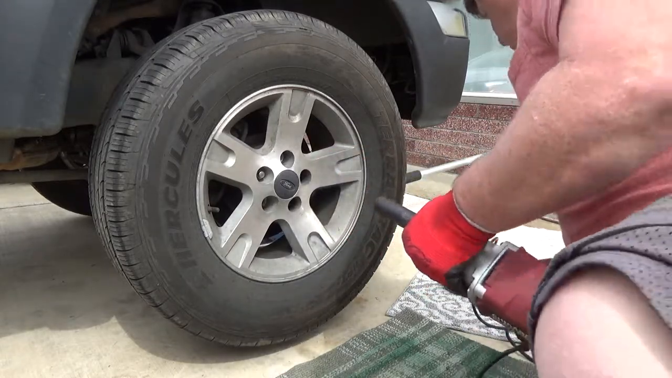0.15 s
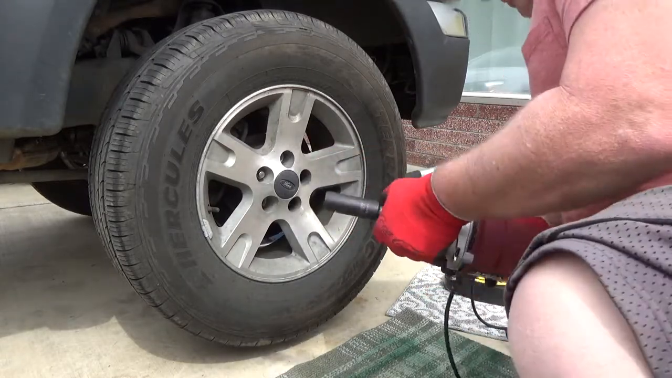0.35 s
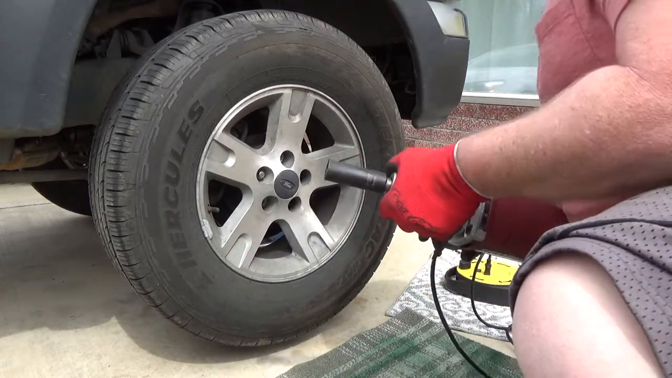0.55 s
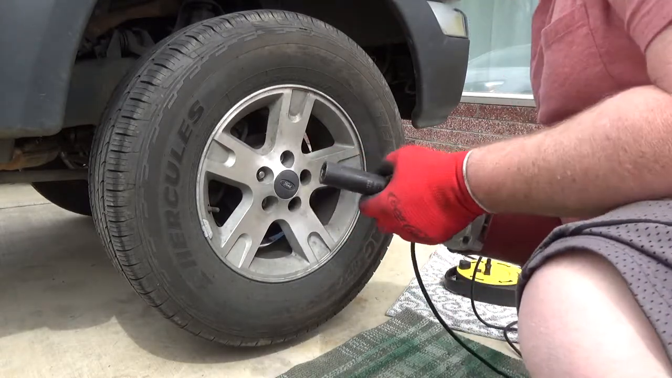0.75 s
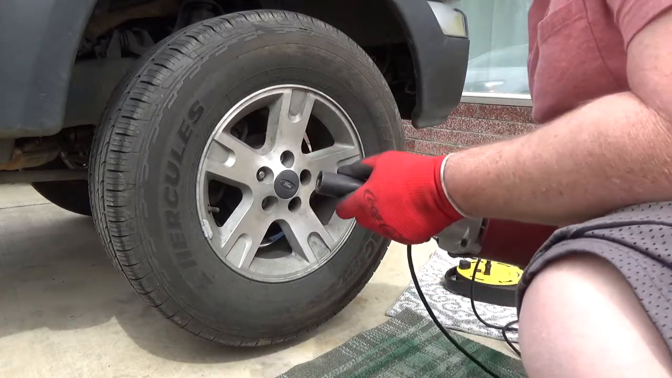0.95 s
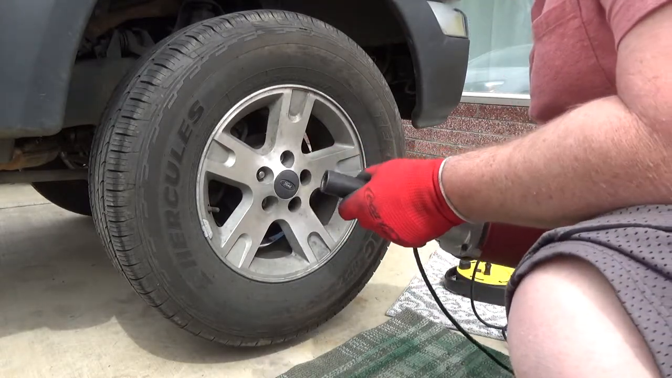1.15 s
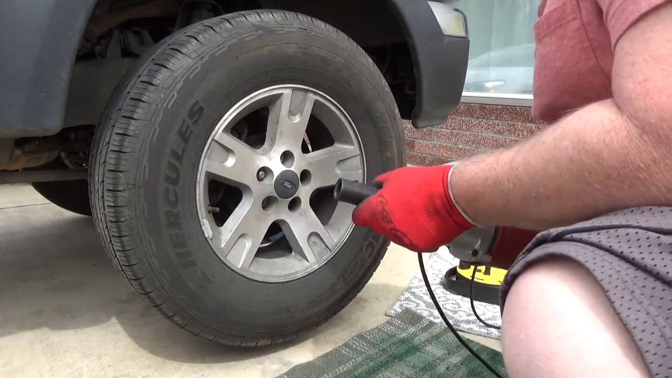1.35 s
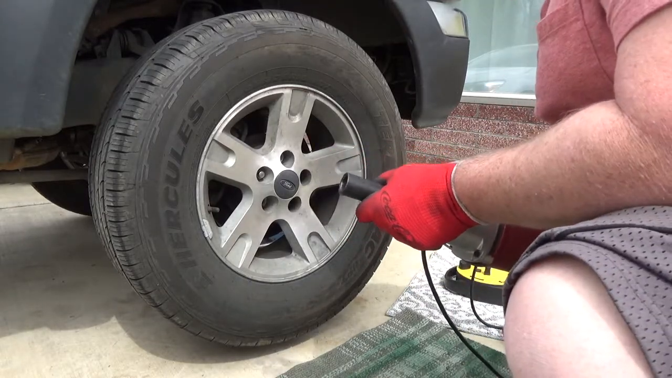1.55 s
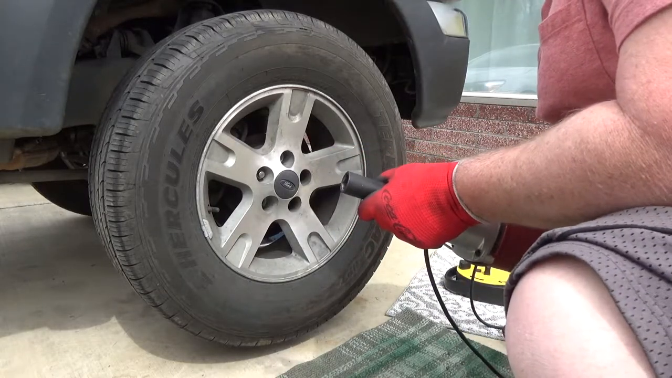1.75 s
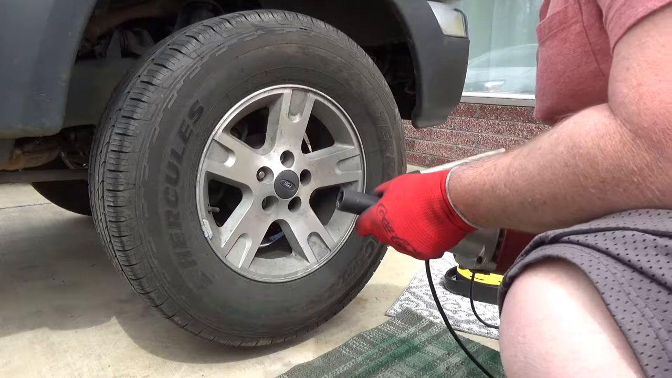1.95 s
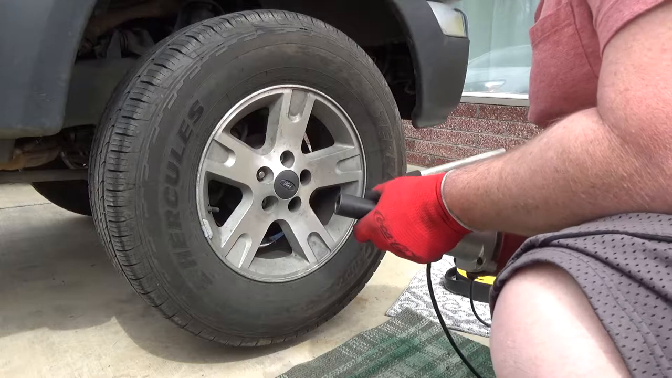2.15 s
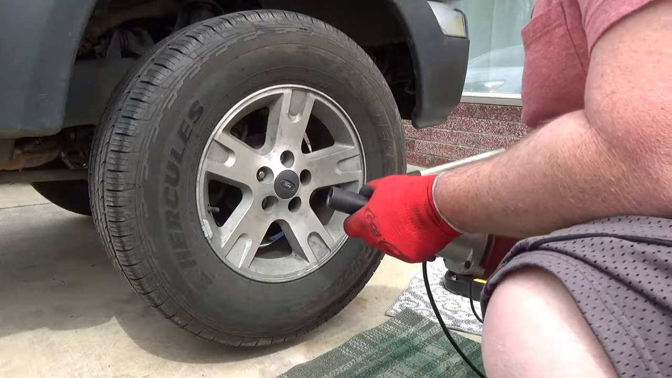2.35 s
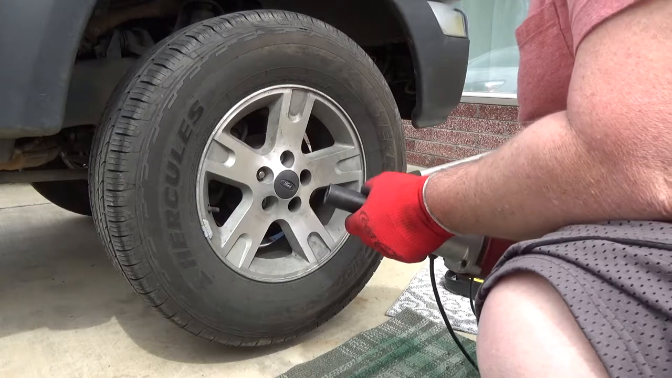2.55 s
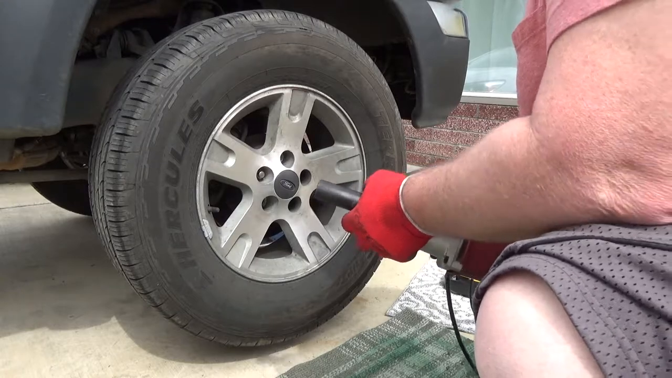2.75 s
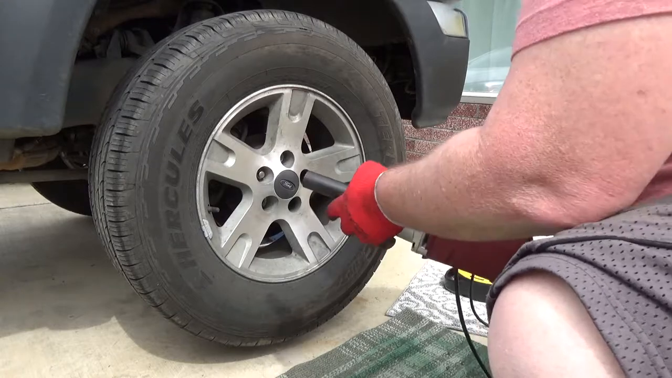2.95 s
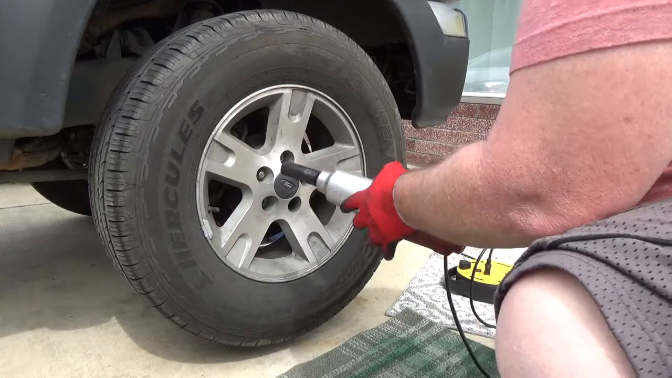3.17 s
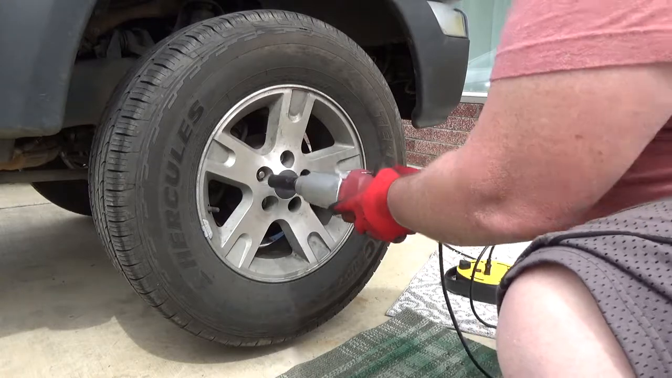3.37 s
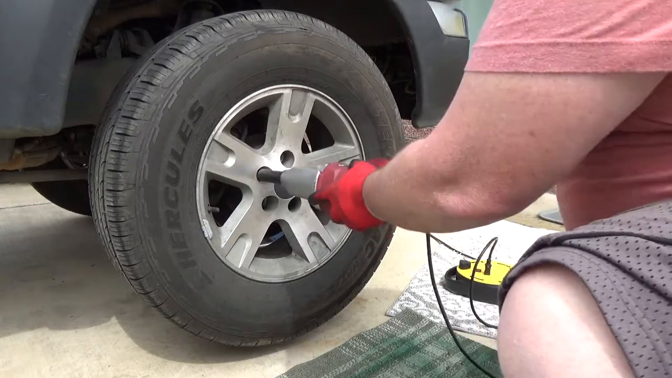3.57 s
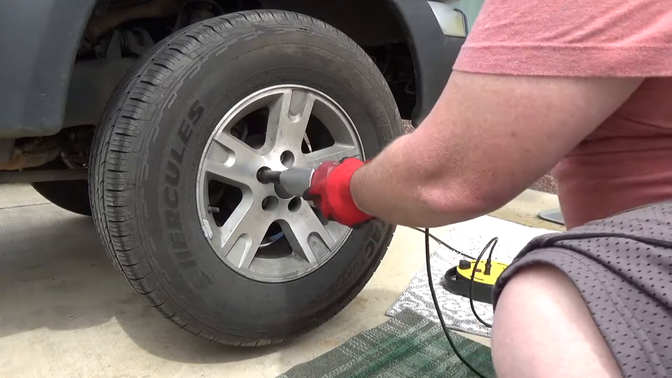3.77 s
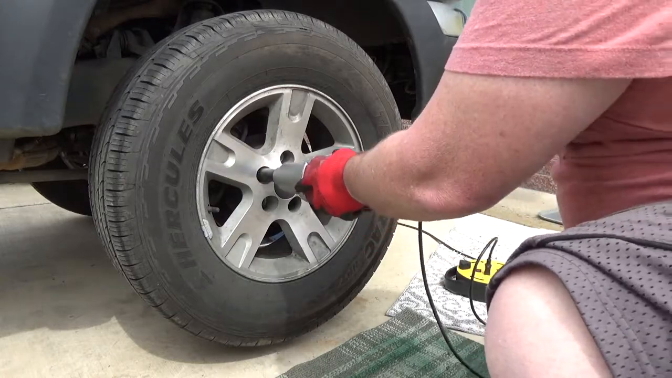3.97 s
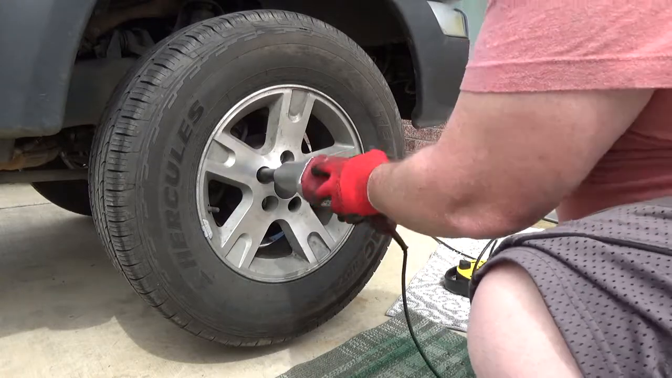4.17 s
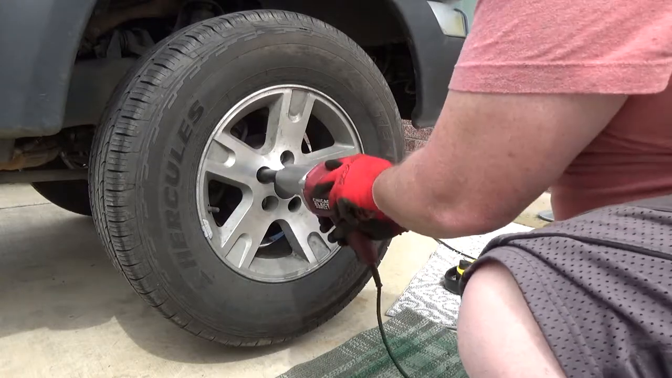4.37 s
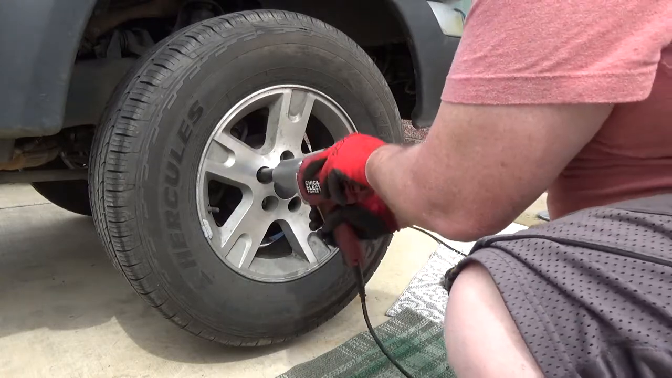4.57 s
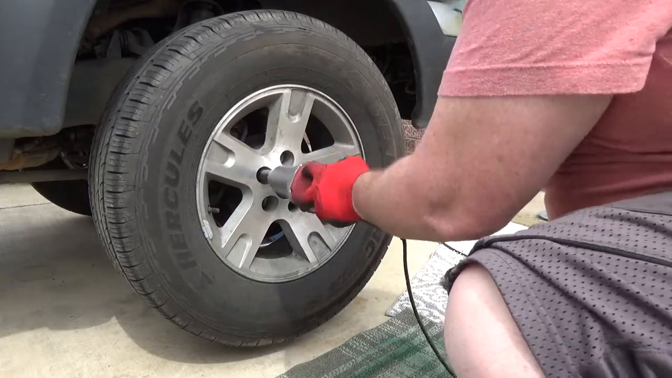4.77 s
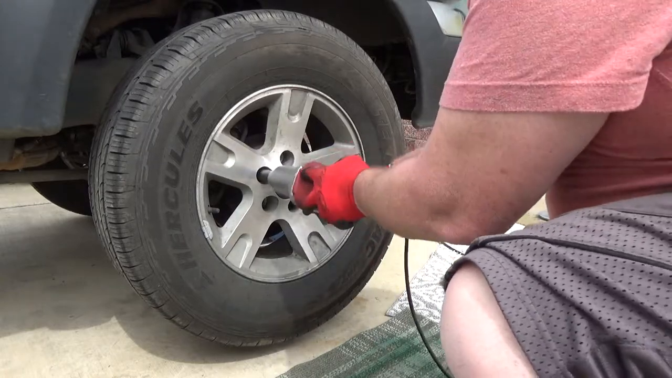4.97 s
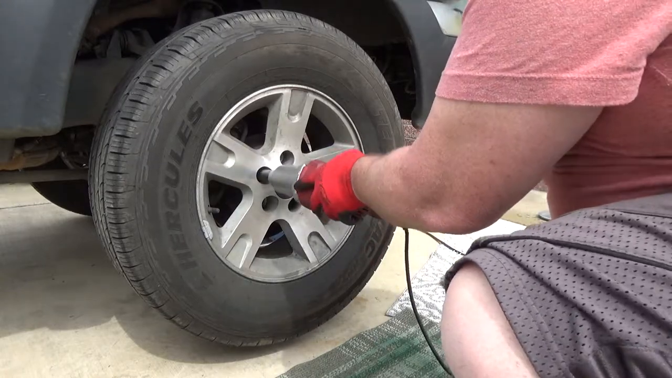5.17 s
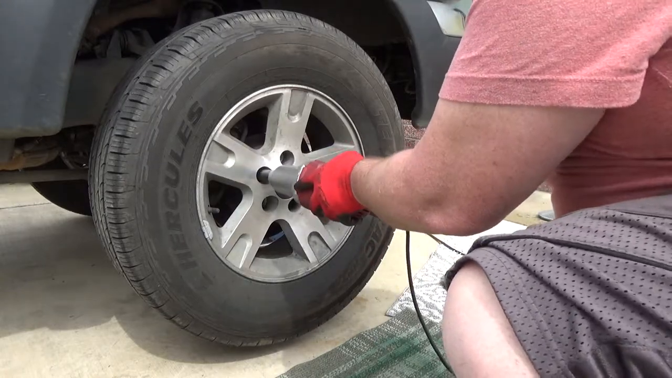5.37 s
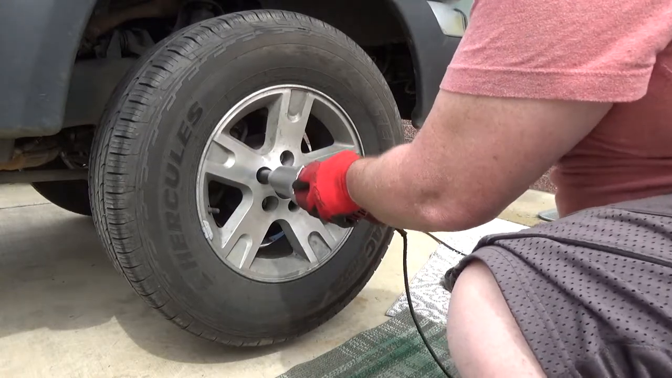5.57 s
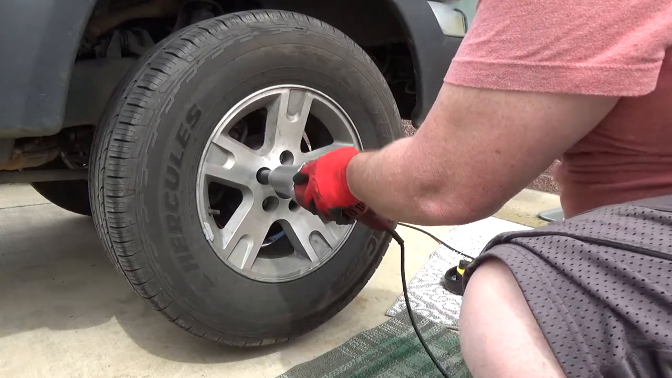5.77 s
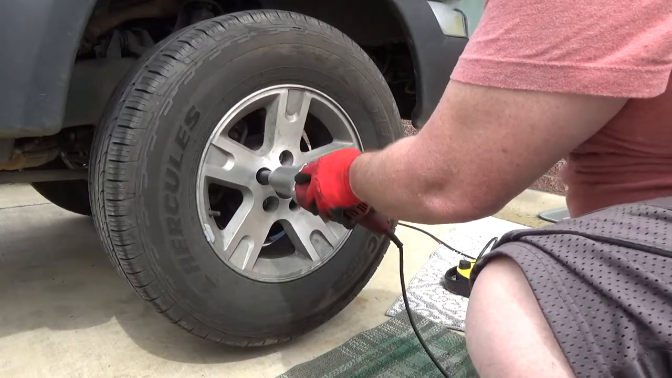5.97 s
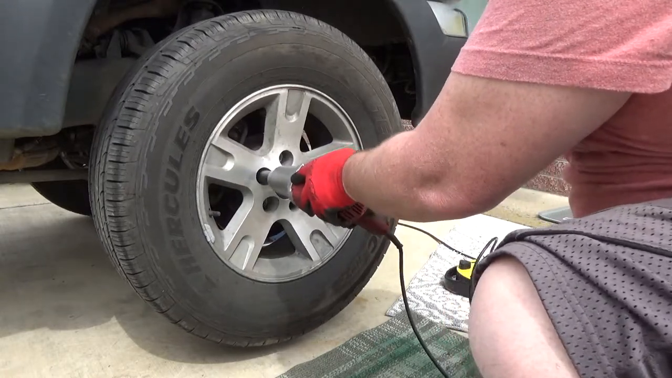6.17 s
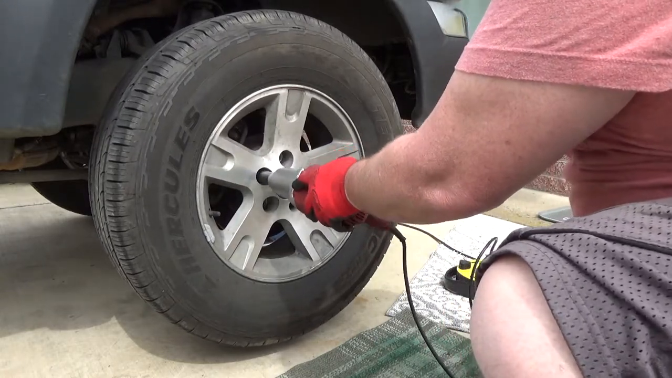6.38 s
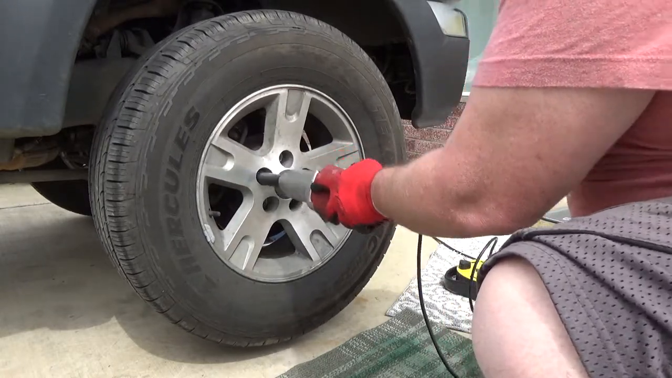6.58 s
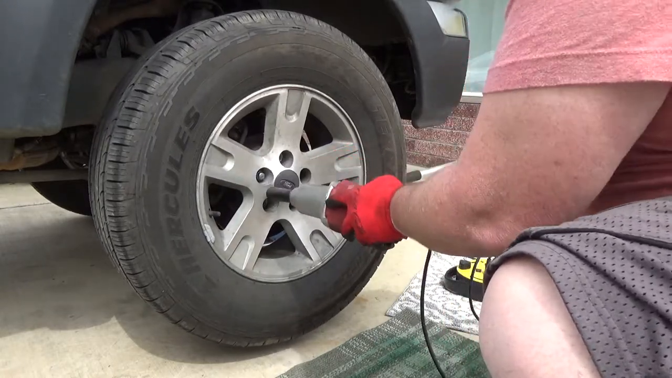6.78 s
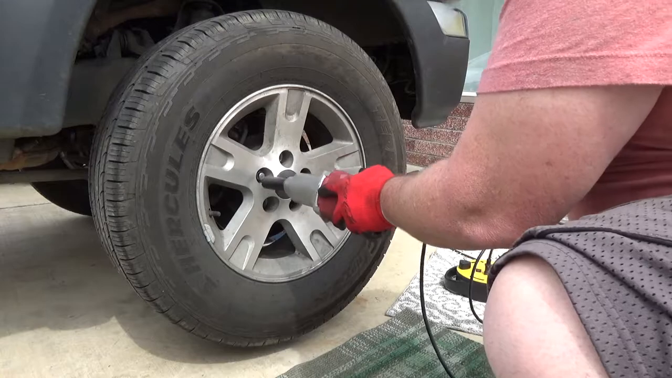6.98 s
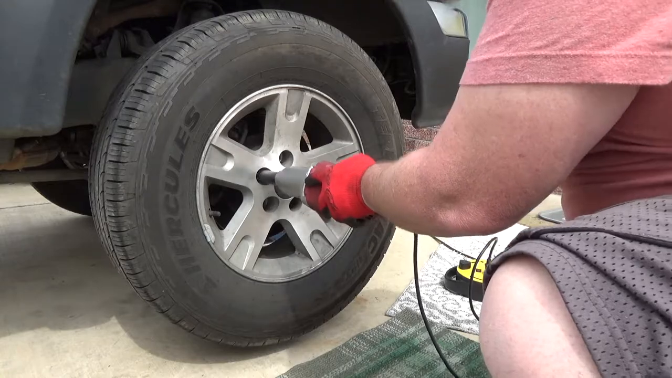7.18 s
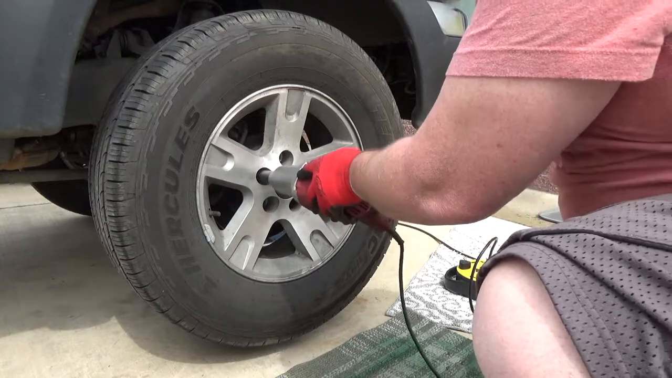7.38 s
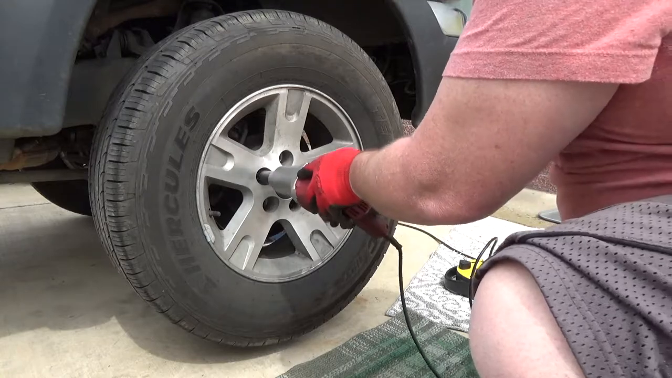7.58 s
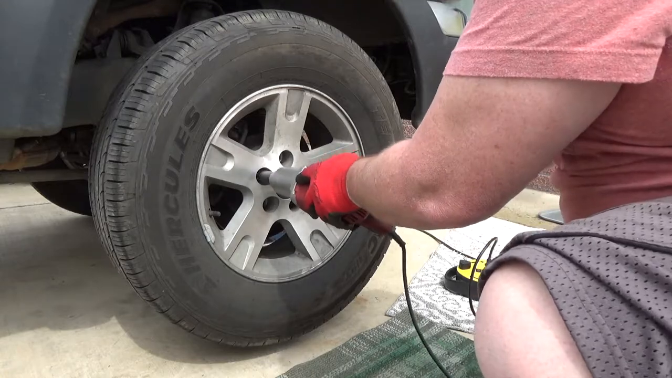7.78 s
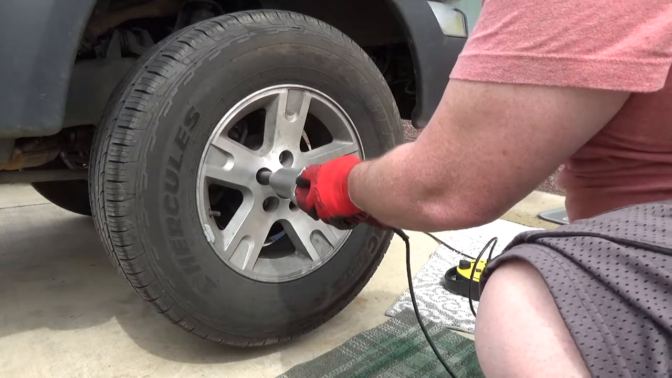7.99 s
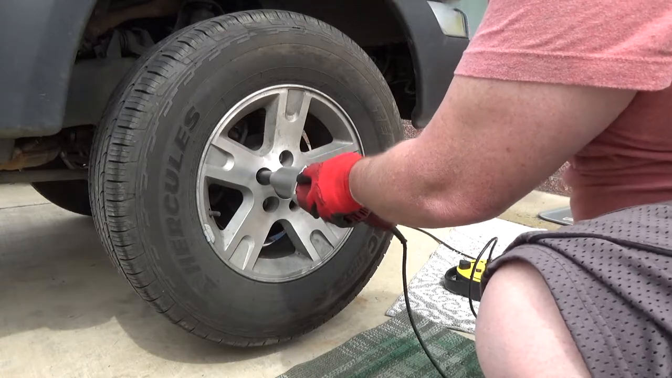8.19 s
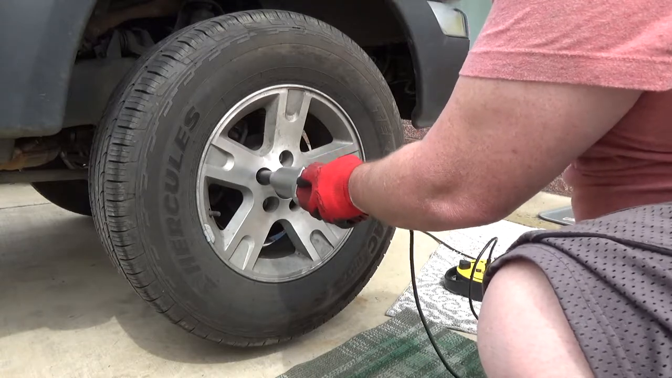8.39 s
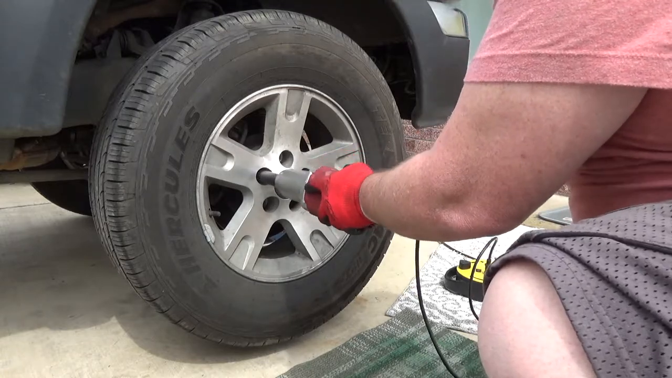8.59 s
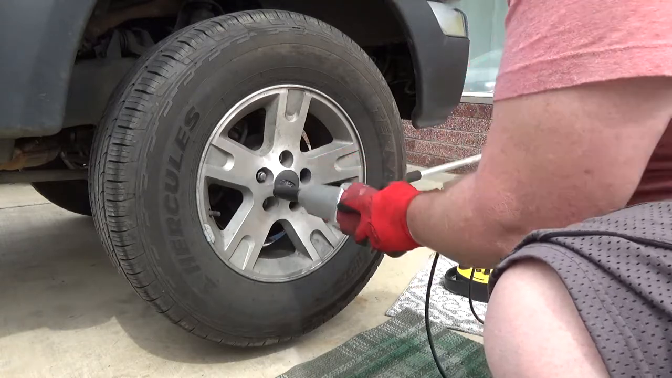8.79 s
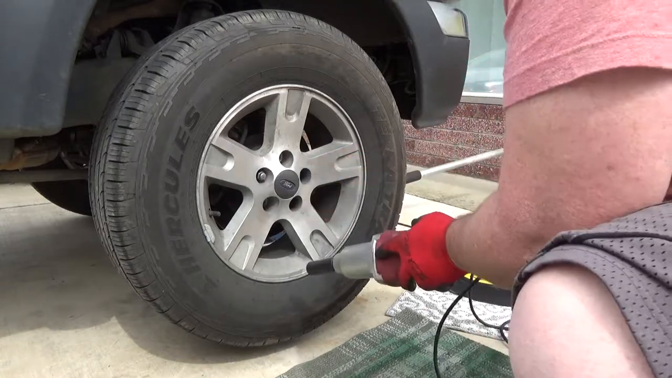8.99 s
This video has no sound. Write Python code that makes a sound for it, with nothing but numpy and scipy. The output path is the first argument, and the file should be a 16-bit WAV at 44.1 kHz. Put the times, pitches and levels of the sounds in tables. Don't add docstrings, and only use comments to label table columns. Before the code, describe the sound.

A quiet outdoor yard with faint distant hum, close to a car wheel; light glove and cable rustle. At 1.1 s a trigger snaps and a corded impact wrench spins freely, gears whining and rattling with fan hiss, peaking early and falling away by 1.8 s, with small low air puffs near 1.6. A second free spin starts at 2.05 and coasts down until about 3.1. Rustling at 3.2, then the socket clacks hard onto the nut at 3.9; softer taps, a loud bright clink at 4.7 and heavy knocks at 4.8. From 5.5 to 6.1 it hammers furiously, about thirty-three metallic blows a second, drowning the whine; the wheel rings briefly and small ticks follow. Soft knocks around 7.1 to 7.3. A last short run at 7.6 jolts unevenly, hardest near 7.9, dying by 8.2. Final socket clunks at 8.65 and a tap at 8.9. Short hard echoes, squashed peaks.

```python
import sys
import numpy as np
from scipy import signal
from scipy.fft import rfft, irfft, next_fast_len
from scipy.io import wavfile
from scipy.ndimage import uniform_filter1d, minimum_filter1d

SR = 44100
rng = np.random.default_rng(int(sys.argv[2]) if len(sys.argv) > 2 else 0)


def pcm_store(signal):
    levels = np.round(np.clip(np.atleast_2d(signal), -1, 1) * 32767)
    wavfile.write(sys.argv[1], SR, levels.astype(np.int16).T)


def nominal_scale(level):
    x = np.asarray(level, float) / 20
    return 10 ** x


N = 398663

# (time [s], level [dB])
YARD_LEVEL = [(0, -54.5), (.9, -55), (1.07, -52.5), (1.9, -54.5), (3.2, -57.5), (3.95, -52.5), (4.3, -55),
              (4.8, -52.5), (5.2, -55), (6.3, -60), (6.7, -69), (7.25, -64), (7.54, -65.5), (8.4, -64),
              (8.64, -61.5), (9.04, -63.5)]
# (frequency [Hz], level [dB per Hz])
YARD_COLOUR = [(15, -46.5), (25, -9.5), (153, -12.5), (384, -4.5), (734, -0.5), (1370, -5), (1650, -6.5),
               (1790, -5), (3250, -9.5), (3620, -8), (4140, -10), (16000, -30)]
# (frequency [Hz], likeness [0 to 1])
YARD_SAME = [(60, 0.94), (180, 0.96), (550, 0.87), (1650, 0.21), (4970, 0.47), (15000, 0.93)]
# (frequency [Hz], width [Hz], level under the yard noise [dB])
HUM = (160, 21, -15.5)
# (frequency [Hz], width [Hz], level [dB])
DRONE = (201, 8, -84)
# (frequency [Hz], level [dB per Hz])
RUSTLE_COLOUR = [(290, -31.5), (500, -2), (807, -10), (1180, 0), (1360, -8), (2230, -0.5), (4660, -1.5),
                 (5710, -2), (6610, -3.5), (7310, -5), (16000, -25.5)]
# (frequency [Hz], width [Hz], level [dB])
RUSTLE_PEAK = (5800, 300, 5)
# (time [s], level [dB], half length [s])
SWISHES = [(.25, -62, 0.42), (0.699, -59.5, 0.39), (0.835, -63, 0.053), (2.05, -52, 0.08),
           (3.193, -51.5, 0.32), (3.26, -87, 0.099), (4.094, -67, .1), (4.262, -50.5, 0.24),
           (4.97, -63.5, 0.3), (5.063, -52.5, 0.019), (6.56, -62, 0.11), (7.3, -72, 0.18),
           (8.723, -56.5, 0.15)]

# (time [s], peak [dB], strongest ring [Hz], treble lift if any [dB])
CLUNKS = [
    (0.004, -35, 2600, 10),
    (3.9, -23, 4360, -1),
    (3.9345, -14, 3620, 8),
    (3.9428, -11, 4340, -2),
    (4.824, -19, 4320, 12),
    (7.3168, -22, 3950, -4),
    (8.701, -22.5, 4200, 6),
]
TAPS = [(0.293, -29, 1920), (3.875, -18, 1970), (4.097, -28.5, 2020), (4.541, -27, 1734),
        (4.813, -15, 1590), (6.199, -34, 1490), (6.283, -47, 1590), (6.358, -37.5, 1680),
        (6.518, -38.5, 1710), (8.191, -20, 1800), (8.244, -34.5, 1590), (8.907, -21.5, 4110)]
SWITCH = [
    (1.091, -28, 1700),
    (1.0955, -21.5, 2070),
    (1.132, -20, 4970),
    (1.138, -13, 4330),
    (2.056, -18, 1830),
    (5.465, -25, 1600),
    (7.564, -28.5, 4230),
    (7.574, -17, 6140),
]
TICKS = [
    (1.813, -34, 2030),
    (6.185, -30, 1500),
    (6.335, -58, 1650),
    (6.568, -53, 1900),
    (6.151, -25, 1590),
    (6.164, -26, 1220),
    (6.283, -45.5, 1550),
]
BUMPS = [
    (3.723, -33, 1180),
    (4.505, -48, 607),
    (4.794, -39, 743),
    (6.626, -47.5, 1540),
    (7.0835, -33.5, 1210),
]
SEATINGS = [
    (3.9255, -22, 2370, 0),
    (3.947, -18, 1300, -4),
    (4.817, -15.5, 1710, 1),
    (7.208, -29.5, 2084, -1),
    (8.643, -33, 5000, 7),
    (8.647, -28, 1880, 3.5),
]
CLINKS = [
    (4.718, -5, 4400, -5),
    (4.735, -19, 4100, -3),
    (4.857, -38, 4300, -5),
    (4.887, -20, 3020, -2),
    (7.2865, -29.5, 4280, -8.5),
    (8.428, -42, 1954, -9),
    (8.433, -24, 4210, -6.5),
    (8.558, -42.5, 2420, -15),
]
JOLTS = [
    (5.536, -2, 4030),
    (6.091, -8.5, 4000),
    (7.592, -12, 1590),
    (7.609, -7, 1760),
    (7.618, -8.5, 2360),
    (7.857, -8, 3980),
    (7.872, 1, 1690),
    (7.9635, -10, 3020),
    (8.028, -16.5, 1600),
]
SLAPS = [
    (7.925, -6, 5200, -6),
    (7.93, -19.5, 5700, -6),
    (7.637, -11, 6000),
    (8.1435, -14.5, 4098, -5),
]
# (frequency [Hz], level [dB], time to fall 60 dB [s])
RIM = [(614, -7, .06), (764, -7, .06), (1141, -5, .055), (1330, -5, .05), (1930, -4, .05), (2870, -12, .04),
       (3655, -12, .04), (4100, -6, .03), (5200, -12, .03), (5900, -9, .03), (8100, -13, .03)]

# (time [s], housing rattle [dB])
RUNS = [
    [(1.088, -31), (1.12, -29), (1.162, -20.5), (1.258, -19.5), (1.578, -21.5), (1.706, -31), (1.81, -55)],
    [(2.052, -32.5), (2.098, -24), (2.268, -22.5), (2.6, -24.5), (2.952, -35), (3.054, -47), (3.16, -68)],
    [(5.46, -42.5), (5.478, -31.5), (5.496, -19), (5.594, -24), (5.948, -23), (6.088, -25.5), (6.18, -36.5),
     (6.28, -64)],
    [(7.56, -54), (7.594, -27.5), (7.75, -27), (7.92, -30), (7.94, -31), (8.1, -34), (8.14, -38),
     (8.178, -53), (8.24, -54)],
]
# (time [s], cycle rate [Hz])
SPEEDS = [
    [(1.1, 260), (1.168, 546), (1.2, 665), (1.234, 742), (1.266, 703), (1.414, 508), (1.58, 279),
     (1.78, 120)],
    [(2.06, 200), (2.142, 557), (2.19, 730), (2.236, 790), (2.36, 668), (2.508, 470), (2.67, 275),
     (2.8, 160), (3.1, 60)],
    [(5.47, 120), (5.55, 480), (5.9, 520), (6.09, 400), (6.15, 170), (6.28, 70)],
    [(7.58, 170), (7.676, 580), (7.724, 678), (7.762, 630), (7.864, 490), (8, 295), (8.12, 180), (8.24, 90)],
]
# (gear case ring [dB], brush and fan hiss [dB], full above [Hz], panel [Hz], panel level [dB])
PULLS = [
    (-8.5, -5, 500, 2270, 5.5),
    (1.5, -4, 335, 5400, 7.5),
    (6.5, 0.5, 845, 3300, 6),
    (4.5, -13, 436, 1500, 9.5),
]
# (whine over the rattle [dB], clear above [Hz],
# share of the housing peaks [0 to 1], slope above that speed [dB per octave])
CLEAR = [
    (-14.5, 290, .8, -1),
    (-14, 370, 1, -3),
    (-32, 450, .7, 0),
    (-15.5, 620, .7, 0),
]
# (frequency [Hz], level [dB per Hz])
FACING = [
    [(35, -77.5), (60, -56), (398, -19), (785, -5.5), (1470, -8.5), (1820, -6), (5330, 2.5), (11500, -29.5),
     (13600, -36.5), (16000, -68.5)],
    [(35, -76.5), (60, -42), (227, -35.5), (593, -6.5), (968, -8.5), (1820, -5), (3270, -2), (5460, -6),
     (8920, -19.5), (16000, -46)],
    [(35, -68), (60, -34), (458, -16.5), (715, -3.5), (803, -7), (1580, 0), (3270, -3), (4120, 6),
     (9130, -9), (16000, -38)],
    [(35, -62), (60, -32), (437, -17.5), (492, -12.5), (822, -8.5), (1780, -4.5), (2840, -6.5), (6140, -7),
     (10800, -17), (16000, -38.5)],
]
# (frequency [Hz], level over the rattle [dB], slope with speed [dB per octave])
NOSE = [
    (1950, -10, 1),
    (1740, -20, -8),
    (1600, -24.5, -7.5),
    (1690, -17, -7),
]
# (level [dB], ...)
WHINE = [
    [-10, -2, -8, -6, -1, -13, -3, -8, -7, -13],
    [-13, -7, -7, -1, -3, -1, -5, 0, -3, -6],
    [-10, -4, -8, -4, -3, -6, -13, -3, -6, -12],
    [-4, -9, -8, -9, -3, -10, -12, 0, -5, -12],
]
MULTIPLES = [1, 2, 3, 4, 6, 8, 9, 10, 12, 14]
# (frequency [Hz], width [Hz], level [dB])
GEAR_CASE = [(740, 250, 6), (1400, 200, 4), (1780, 300, 8), (2850, 400, 6), (4350, 500, 6), (5900, 700, 6),
             (8600, 1200, 5)]
# (frequency [Hz], width [Hz], level [dB])
HOUSING = [(616, 150, 1.5), (726, 45, 1), (1590, 36, 5), (1826, 150, 7), (2300, 60, 4.5), (4104, 900, 5.5),
           (5570, 74, 5), (6120, 680, 6), (9170, 1900, 8.5)]

# (time [s], level [dB], fade [dB per s])
PUFFS = [
    (1.564, -22.5, 300),
    (1.583, -29, 400),
    (1.654, -32, 300),
    (1.672, -39, 300),
    (1.742, -43.5, 300),
]
# (time [s], level [dB], frequency [Hz], time to fall 60 dB [s])
PINGS = [(3.901, -36, 4450, .07), (3.901, -46, 8650, .07), (8.648, -42, 1840, .13), (7.215, -54, 5400, .2),
         (3.9, -54, 15200, .1), (3.935, -50, 15200, .1), (8.645, -40, 15000, .025), (8.65, -66, 15200, .2)]
# (time [s], peak [dB])
THUDS = [
    (3.944, -36),
    (4.535, -42.5),
    (4.592, -47),
    (4.813, -26.5),
    (6.422, -58),
]

# (time [s], peak [dB])
HAMMERING = [(5.5447, -4), (5.5851, -2), (5.6163, -8.5), (5.6462, -6), (5.677, -1), (5.7062, -5.5),
             (5.7316, -7.5), (5.757, -4.5), (5.7824, -0.5), (5.8093, -3), (5.836, -7.5), (5.865, -1),
             (5.897, -4), (5.928, -3), (5.9578, -2.5), (5.991, -3), (6.0314, -5.5), (6.0796, -8)]
# (time [s], peak [dB], ring [Hz])
BLOWS = [
    (5.49, -17, 6500),
    (5.5205, -29.5, 6200),
    (6.0557, -17.5, 6000),
    (7.6427, -11, 5860),
    (7.8826, -17, 6100),
    (7.8924, -11.5, 6030),
    (7.9238, -19, 5060),
    (7.965, -19, 6330),
]
# (time [s], peak [dB], ring [Hz])
TOP_RINGS = [
    (2.11, -8, 9350),
    (5.466, -36, 9700),
    (6.152, -34, 9900),
    (6.163, -34.5, 9120),
    (7.918, -16, 10620),
]
# (frequency [Hz], level [dB per Hz])
ANVIL = [(500, -14.5), (2500, 1), (4200, 1.5), (6400, 5), (7800, -2.5), (9500, 1), (12500, -19.5),
         (16000, -23.5)]
# (frequency [Hz], level [dB], time to fall 60 dB [s])
WHEEL_RING = [(571, -19, 1.1), (1179, -16, .5), (1513, 1, .75), (2051, -17, .45)]
# (time [s], level [dB])
RING_OUTS = [
    (6.1, -38),
    (8.1, -50),
]
# (time [s], left minus right [dB])
PAN = [(0.0, -1.5), (3.47, -1), (3.57, 1), (8.53, 1), (9.04, 1)]


def evened(x):
    return x / np.sqrt(np.mean(x ** 2) + 1e-20)


def read(points, hz):
    f, value = np.transpose(points)
    return np.interp(np.log(hz + 1), np.log(f + 1), value)


def add(mix, s, sound):
    part = mix[..., round(s * SR):][..., :sound.shape[-1]]
    part += sound[..., :part.shape[-1]]


def bins(x):
    return np.fft.rfftfreq(x.shape[-1], 1 / SR)


def coloured(x, gain):
    return irfft(rfft(x) * gain, x.shape[-1])


def above(hz, edge_hz):
    return 1 / (1 + (edge_hz / (hz + 1)) ** 8)


def resonance(hz, centre_hz, width_hz):
    return 1 / (1 + (2 * (hz - centre_hz) / width_hz) ** 2)


def highpass(x, hz):
    return signal.lfilter(*signal.butter(2, hz, "high", fs=SR), x)


def wander(count, hz):
    return evened(signal.lfilter(*signal.butter(2, hz, fs=SR), rng.standard_normal(count)))


def yard():
    a, b, c, d = rng.standard_normal((4, next_fast_len(N)))
    hz = bins(a)
    same = np.clip(read(YARD_SAME, hz), 0, 1)
    right = coloured(a, same) + coloured(b, np.sqrt(1 - same ** 2))
    far = evened(coloured(np.array([a, right]), nominal_scale(read(YARD_COLOUR, hz))))
    hum = evened(coloured(c, resonance(hz, *HUM[:2])))
    drone = evened(coloured(d, resonance(hz, *DRONE[:2])))[:N]
    level_db = np.interp(np.arange(N) / SR, *np.transpose(YARD_LEVEL)) + 0.5
    return nominal_scale(DRONE[2]) * drone + nominal_scale(level_db) * (far + nominal_scale(HUM[2]) * hum)[:, :N]


def rustle():
    t = np.arange(N) / SR
    middle = rng.standard_normal(next_fast_len(N))
    wide = rng.standard_normal((2, len(middle)))
    hz = bins(middle)
    grain_db = 1.6 * wander(len(middle), 300) + 0.96 * wander(len(middle), 5.9)
    colour_db = read(RUSTLE_COLOUR, hz) + RUSTLE_PEAK[2] * resonance(hz, *RUSTLE_PEAK[:2])
    rub = evened(coloured(middle * nominal_scale(grain_db) + 0.15 * wide, nominal_scale(colour_db)))
    at_rest = nominal_scale(np.interp(t, *np.transpose(YARD_LEVEL)) - 15.5)
    swish = sum(nominal_scale(db) * np.exp(-((t - at) / half_s) ** 2) for at, db, half_s in SWISHES)
    return (at_rest + swish) * rub[:, :N]


def strike(hz, colour, t60, ring_db, rim_db, rise):
    t = np.arange(8192) / SR
    crack = evened(coloured(rng.standard_normal(len(t)), nominal_scale(read(colour, bins(t)))))
    after = nominal_scale(-24.5 - 60 * t / .09) * np.minimum(t / 0.016, 1)
    crack = crack * (nominal_scale(-60 * t / t60) + after)
    ring_t60 = min(.8 * t60, 55 / hz)
    ring = nominal_scale(ring_db - 60 * t / ring_t60) * np.sin(2 * np.pi * hz * t)
    rim = 0
    for mode_hz, db, mode_t60 in RIM:
        level_db = db + read(colour, mode_hz) + 2.5 * rng.standard_normal()
        pitch = mode_hz * (1 + .03 * rng.standard_normal())
        rim = rim + nominal_scale(level_db - 60 * t / mode_t60) * np.sin(2 * np.pi * pitch * t)
    sound = (crack + ring + nominal_scale(rim_db) * rim) * np.minimum(t / rise, 1)
    sound = highpass(sound, 350)
    return sound / abs(sound).max()


def knock_kind(out, events, dull_db, bright_db, t60, ring_db):
    for s, db, hz, *lift_db in events:
        treble_db = bright_db + sum(lift_db)
        colour = [(120, dull_db - 14.5), (600, dull_db + 8.0), (1300, dull_db + 16.0), (3000, 0.62),
                  (6000, treble_db + 7.5), (9500, treble_db - 4.5),
                  (12500, treble_db - 29.5), (16000, treble_db - 26.5)]
        add(out, s, nominal_scale(db + 1.5) * strike(hz, colour, t60, ring_db, rim_db=-17, rise=.0015))


def knocks():
    out = np.zeros(N)
    knock_kind(out, CLUNKS, dull_db=-13.5, bright_db=-13, t60=0.017, ring_db=2.7)
    knock_kind(out, TAPS, dull_db=-7, bright_db=-10, t60=0.031, ring_db=0)
    knock_kind(out, SWITCH, dull_db=-21, bright_db=-5, t60=0.023, ring_db=-2.7)
    knock_kind(out, TICKS, dull_db=-1.5, bright_db=2.7, t60=0.068, ring_db=1)
    knock_kind(out, BUMPS, dull_db=4.8, bright_db=-24, t60=0.051, ring_db=-0.86)
    knock_kind(out, SEATINGS, dull_db=-11, bright_db=-8.5, t60=0.076, ring_db=-1)
    knock_kind(out, CLINKS, dull_db=-19, bright_db=-5, t60=0.0099, ring_db=2.6)
    knock_kind(out, JOLTS, dull_db=-15, bright_db=-13.5, t60=0.016, ring_db=1.7)
    knock_kind(out, SLAPS, dull_db=-11, bright_db=-8, t60=0.027, ring_db=8.7)
    return out


def driveway(x):
    taps = np.zeros((2, 8820))
    at = np.arange(100, 8800, 20) + rng.integers(0, 20, (2, 435))
    np.put_along_axis(taps, at, rng.choice([-1., 1.], at.shape), 1)
    hz, t, z = signal.stft(taps, SR, nperseg=128)
    t60 = read([(400, 0.083), (2000, 0.23), (6000, 0.074), (12000, 0.013)], hz)
    tail = signal.istft(z * nominal_scale(-60 * t / t60[:, None]), SR, nperseg=128)[1]
    return signal.fftconvolve(x[None], tail / np.linalg.norm(tail[0]), axes=1)[:, :N]


def patchy(x, depth_db):
    z = signal.stft(x, nperseg=512, noverlap=384)[2]
    field = rng.standard_normal(z.shape[::-1])
    field = uniform_filter1d(uniform_filter1d(field, size=12, axis=0), size=5, axis=1)
    z = z * nominal_scale(depth_db * evened(field).T)
    return evened(signal.istft(z, nperseg=512, noverlap=384)[1][:len(x)])


def tooth_chatter(turns):
    count = len(turns)
    teeth = 1.5 + np.exp(-(2 * turns % 1) / 0.27)
    backlash = nominal_scale(.4 * wander(count, 240) + .9 * wander(count, 45))
    return patchy(teeth * backlash * rng.standard_normal(count), depth_db=1.6)


def gear_whine(turns, speed, orders):
    smear_db = -.16 * np.maximum(np.gradient(speed) * SR / 1000, 0)
    whine = 0
    for k, db in orders:
        hz = k * speed
        case_db = sum(d * resonance(hz, f, width) for f, width, d in GEAR_CASE)
        level = nominal_scale(db + k * smear_db + 3 * wander(len(turns), 30) + case_db)
        level = level * (1 - above(hz, 9500))
        whine = whine + level * np.cos(2 * np.pi * (k * turns + rng.random()))
    return whine


def wrench(rows, cycle, pull, clear, facing, cone, orders):
    case_db, brush_db, full_hz, panel_hz, panel_db = pull
    clear_db, clear_hz, peak_share, fast_slope = clear
    cone_hz, cone_db, cone_slope = cone
    s, effort_db = np.transpose(rows)
    t = s[0] + np.arange(next_fast_len(int((s[-1] - s[0]) * SR))) / SR
    rattle_db = np.interp(t, s, effort_db)
    speed = np.interp(t, *np.transpose(cycle))
    speed = uniform_filter1d(speed, size=800, mode="nearest")
    turns = np.cumsum(speed * (1 + .005 * wander(len(t), 60))) / SR

    slow = np.minimum(np.log2(speed / full_hz), 0)
    ring_db = rattle_db + case_db + 9 * slow
    hiss_db = rattle_db + brush_db + 7.5 * slow
    octaves = np.log2(speed / clear_hz)
    whine_db = clear_db + 14 * np.minimum(octaves, 0) + fast_slope * np.maximum(octaves, 0)
    chatter = tooth_chatter(turns)
    drive = chatter + nominal_scale(whine_db) * gear_whine(turns, speed, orders)

    hz = bins(t)
    panels = HOUSING + [(panel_hz, 0.32 * panel_hz, panel_db)]
    peaks_db = sum(db * resonance(hz, f, width) for f, width, db in panels)
    body = nominal_scale(read(facing, hz) + peak_share * peaks_db)
    low, top = 1 - above(hz, 2500), above(hz, 7780)
    out = 0
    for db, share in (rattle_db, low), (ring_db, (1 - low) * (1 - top)), (hiss_db, top):
        out = out + nominal_scale(db) * evened(coloured(drive, body * np.sqrt(share)))
    nose = evened(coloured(chatter, resonance(hz, cone_hz, 260)))
    out = out + nominal_scale(rattle_db + cone_db + cone_slope * slow) * nose
    return s[0], out * signal.windows.tukey(len(t), .02)


def draught():
    t = PUFFS[0][0] + np.arange(SR // 3) / SR
    colour = [(30, -29.0), (110, -1.0), (300, -1.5), (600, -10.0), (2000, -53.5)]  # (Hz, dB)
    air = coloured(rng.standard_normal((2, len(t))), nominal_scale(read(colour, bins(t))))
    air = evened(air + 0.255 * air[::-1])
    puffs = 0
    for s, db, fade_db in PUFFS:
        puffs = puffs + nominal_scale(db - fade_db * abs(t - s)) * np.clip((t - s) / 0.0087, 0, 1)
    lumps = nominal_scale(3.4 * wander(len(t), 107))
    return t[0], air * puffs * lumps * signal.windows.tukey(len(t), .1)


def socket_pings():
    out, t = np.zeros(N), np.arange(8192) / SR
    for s, db, hz, t60 in PINGS:
        add(out, s, nominal_scale(db - 60 * t / t60) * np.sin(2 * np.pi * hz * t))
    return out


def thuds():
    out, t = np.zeros(N), np.arange(8192) / SR
    colour = 1 / (1 + ((bins(t) - 320) / 150) ** 4)
    for s, db in THUDS:
        lump = evened(coloured(rng.standard_normal(len(t)), colour))
        add(out, s, nominal_scale(db - 60 * t / .14) * np.minimum(t / 0.0057, 1) ** 2 * lump)
    return out


def hammer():
    out = np.zeros(N)
    steady = [(s, db, 6400 * (1 + .05 * rng.standard_normal())) for s, db in HAMMERING]
    for s, db, hz in steady + BLOWS:
        add(out, s, nominal_scale(db + 12) * strike(hz, ANVIL, t60=.018, ring_db=0, rim_db=-30, rise=.0008))
    for s, db, hz in TOP_RINGS:
        add(out, s, nominal_scale(db + 12) * strike(hz, ANVIL, t60=.015, ring_db=12, rim_db=-30, rise=.0008))
    return out


def wheel_ring():
    out, t = np.zeros(N), np.arange(SR) / SR
    ring = 0
    for hz, db, t60 in WHEEL_RING:
        ring = ring + nominal_scale(db - 60 * t / t60 + 1.5 * wander(SR, 30)) * np.sin(2 * np.pi * hz * t)
    for s, db in RING_OUTS:
        add(out, s, nominal_scale(db) * ring * np.minimum(t / 0.015, 1))
    return out


def scene():
    near = knocks() + socket_pings() + thuds() + hammer() + wheel_ring()
    for *pull, whine_db in zip(RUNS, SPEEDS, PULLS, CLEAR, FACING, NOSE, WHINE):
        add(near, *wrench(*pull, zip(MULTIPLES, whine_db)))
    pan_db = np.interp(np.arange(N) / SR, *np.transpose(PAN))
    glance = signal.oaconvolve(near, evened(rng.standard_normal(64)) / 8)[:N]
    glance = nominal_scale(-19) * highpass(glance, 6000)
    direct = near * nominal_scale([pan_db / 2, -pan_db / 2]) + [glance, -glance]
    out = direct + nominal_scale(-17.5) * driveway(near) + yard() + rustle()
    add(out, *draught())
    return out


def roll_off(x):
    return signal.sosfilt(signal.butter(12, 16820, fs=SR, output="sos"), x)


def record(dry):
    dry = highpass(dry, 48)
    over_db = np.maximum(20 * np.log10(abs(dry).max(0) + 1e-9) + 3.6, 0)
    ahead_db = -minimum_filter1d(-over_db, size=133, origin=-66)
    fall_db = np.arange(N) * 1600 / SR
    held_db = np.maximum.accumulate(ahead_db + fall_db) - fall_db
    limited = dry / nominal_scale(uniform_filter1d(held_db, size=24))
    mix = signal.oaconvolve(limited, signal.firwin(511, 15750, fs=SR)[None], "same")
    return roll_off(mix)


dry = scene()
out = record(dry)
pcm_store(out)
```